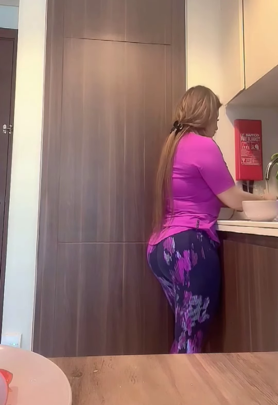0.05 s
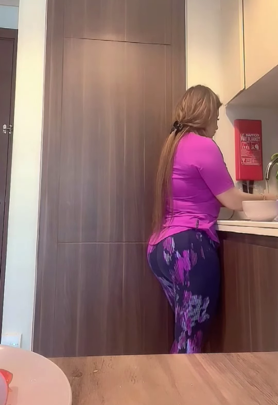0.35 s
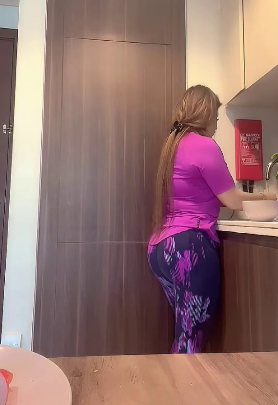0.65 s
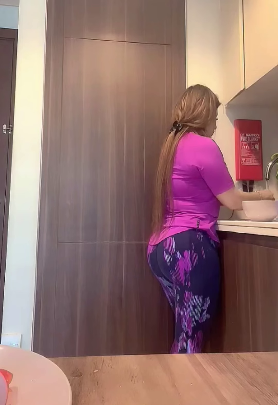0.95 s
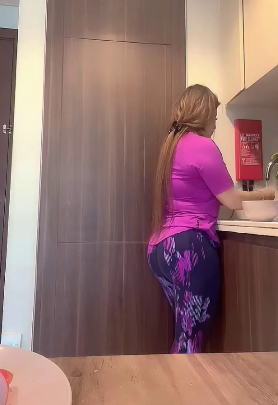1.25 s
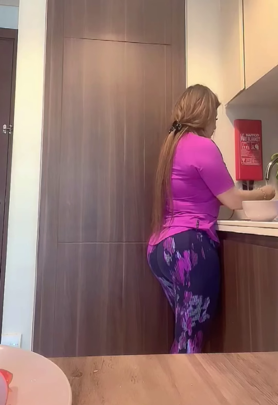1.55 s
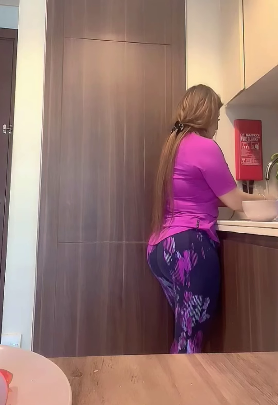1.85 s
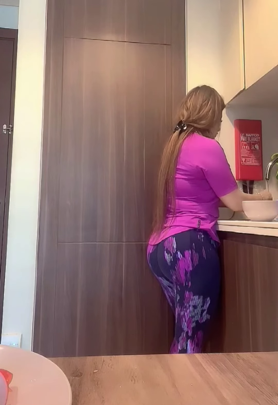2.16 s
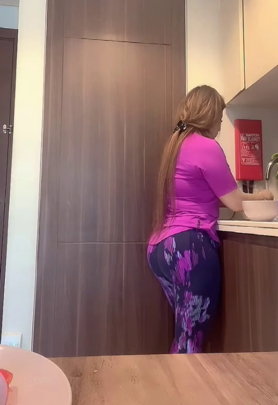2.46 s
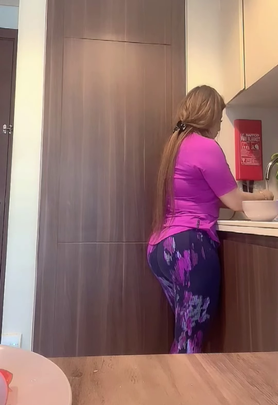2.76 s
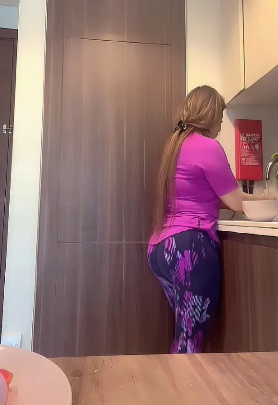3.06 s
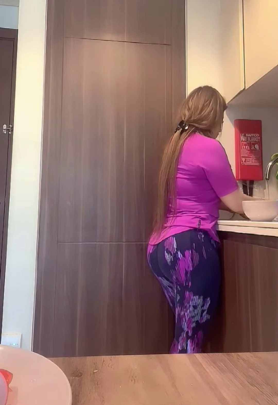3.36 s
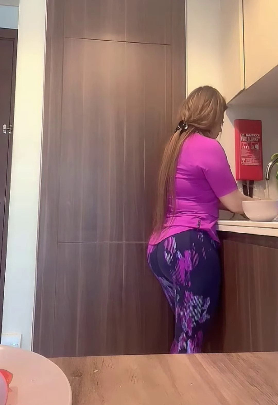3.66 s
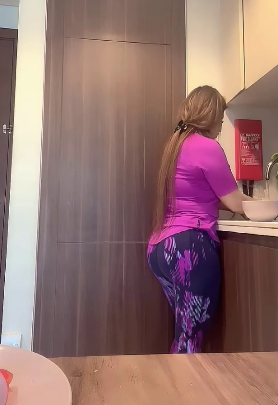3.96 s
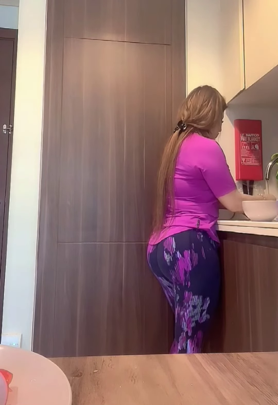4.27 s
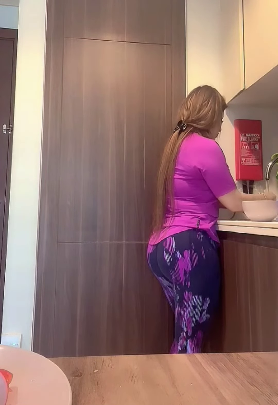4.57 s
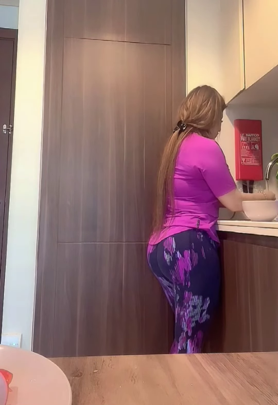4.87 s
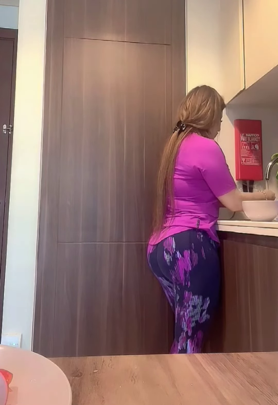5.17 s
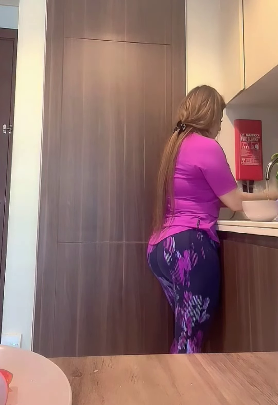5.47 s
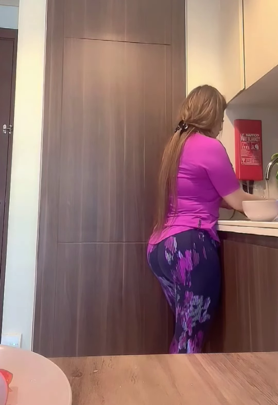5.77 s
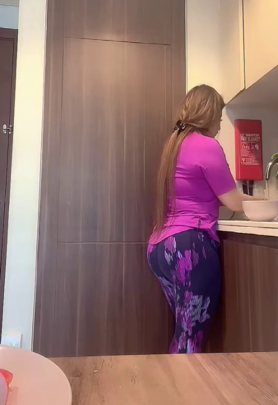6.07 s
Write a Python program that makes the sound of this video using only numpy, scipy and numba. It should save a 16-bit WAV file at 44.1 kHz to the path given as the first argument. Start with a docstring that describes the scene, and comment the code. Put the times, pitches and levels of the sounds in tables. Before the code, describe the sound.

Hands rinse something in a bowl of water at a kitchen sink. After a few faint drips, the water sloshes and spills in irregular bursts, with small wet squelches and single drops that make the sink ring lightly. Brief lulls separate the splashes, which come closer together near the end. It is heard from a few metres away in a small, hard kitchen with a soft rumble and low hum.

```python
"""Rinsing in a kitchen sink.

Hands rinse something in a bowl of water, a few metres away in a small, hard kitchen.
Each move sloshes the water and spills droplets into the ringing sink, as swarms of bubbles.
Wet squelches and single drops stand out, over a soft room rumble and hum."""
import sys
import numpy as np
from scipy import signal
from scipy.fft import rfft, irfft, next_fast_len
from scipy.io import wavfile
from scipy.ndimage import uniform_filter1d
from numba import njit

SR = 44100
rng = np.random.default_rng(int(sys.argv[2]) if len(sys.argv) > 2 else 0)


def generate_wav(sig):
    """Save sig (samples, or channels by samples) to the path in sys.argv[1] as 16-bit PCM at SR."""
    pcm = np.round(np.clip(np.atleast_2d(sig).T, -1, 1) * 32767).astype(np.int16)
    wavfile.write(sys.argv[1], SR, pcm)


N = 275184
TIME = np.arange(N) / SR
TOP_HZ = 15800


def undb(db):
    """Decibels to gain."""
    return 10 ** (np.asarray(db) / 20)


def shape(x, gain):
    """Filter by a gain that is a function of frequency."""
    size = next_fast_len(len(x) + 2048)
    hz = np.maximum(np.fft.rfftfreq(size, 1 / SR), 1)
    return irfft(rfft(x, size) * gain(hz), size)[:len(x)]


def colour(x, points):
    """Filter by (Hz, dB) points."""
    hz, db = np.transpose(points)
    return shape(x, lambda f: undb(np.interp(np.log(f), np.log(hz), db)))


def drift(rate_hz):
    """Smooth random drift with a spread near 1."""
    return np.interp(TIME * rate_hz, np.arange(1000), rng.standard_normal(1000))


def add(track, start_s, sound, db):
    """Mix in a short sound whose loudest 6 ms have the given level."""
    power = uniform_filter1d(sound ** 2, size=265).max()
    start = max(int(start_s * SR), 0)
    part = track[start:start + len(sound)]
    part += sound[:len(part)] * undb(db) / np.sqrt(power + 1e-18)


# Room noise spectrum. Each row: frequency in Hz, relative density in dB.
AIR_SPECTRUM = [(25, -37), (38, -13), (52, -9), (100, -3), (170, -3), (380, -5.5), (520, -11.5),
                (1000, -10), (2000, -18.5), (4000, -25), (7400, -29), (9500, -47.5), (15500, -101)]
# Hum tones. Each row: frequency in Hz, offset from the hum level in dB.
HUM_TONES = [(72, -4.5), (97, -9)]
# Hum level. Each row: time in seconds, level in dB.
HUM_LEVEL = [(0.0, -57), (0.8, -59), (0.97, -50), (1.2, -63), (1.74, -50), (2.0, -56.5), (4.6, -60),
             (5.9, -58), (6.08, -51), (6.24, -49)]


def kitchen(air_db=-50.5, waver_db=2):
    """Soft rumble and hiss of the room, with a low wavering hum."""
    air = colour(rng.standard_normal(N), AIR_SPECTRUM)
    out = air * undb(air_db) / np.sqrt(np.mean(air ** 2))
    hum_db = np.interp(TIME, *np.transpose(HUM_LEVEL))
    for hz, offset_db in HUM_TONES:
        rms = undb(hum_db + offset_db + waver_db * drift(2.5))
        phase = 2 * np.pi * hz * TIME + 0.16 * drift(1.72)
        out += np.sqrt(2) * rms * np.sin(phase)
    return out


def room(wet_db, low_t60_s=0.22, high_t60_s=0.25, split_hz=6000, build_s=0.002):
    """Impulse response from the sink: direct sound, then dense reflections off cupboards and tiles."""
    t = TIME[:SR // 4]
    low, high = (rng.standard_normal(len(t)) * 1000 ** (-t / t60) for t60 in (low_t60_s, high_t60_s))
    tail = signal.lfilter(*signal.butter(2, split_hz, fs=SR), low)
    tail += signal.lfilter(*signal.butter(2, split_hz, "high", fs=SR), high)
    tail *= 1 - np.exp(-t / build_s)
    response = tail * undb(wet_db) / np.linalg.norm(tail)
    response[0] += 1
    return response


@njit
def bubbles(starts, hz, life_s, sizes, rise, swell_s, samples):
    """Sum of bubbles: sines that swell, then die by 60 dB within their life while their pitch rises."""
    out = np.zeros(samples)
    for k in range(len(starts)):
        life, phase = life_s[k] * SR, 0.
        for i in range(min(int(life), samples - starts[k])):
            phase += 2 * np.pi * hz[k] / SR * (1 + rise * i / life)
            onset = 1 - np.exp(-(i / (swell_s * SR)) ** 2)
            out[starts[k] + i] += sizes[k] * np.sin(phase) * np.exp(-6.9 * i / life) * onset
    return out


# Single drops. Each row: start in seconds, pitch in Hz, level before trim in dB.
DROPS = [(0.002, 2820, -42), (0.236, 5870, -47.5), (1.089, 3315, -44), (1.358, 1606, -30.5),
         (1.375, 1566, -25), (1.376, 2470, -21), (1.562, 3050, -27), (1.624, 4050, -34),
         (1.739, 1592, -35.5), (1.751, 371, -37.5), (1.79, 2870, -35), (1.881, 1097, -34.5),
         (1.886, 3470, -30.5), (2.054, 857, -20.5), (2.059, 1008, -26.5), (2.078, 2440, -31.5),
         (2.085, 828, -21.5), (2.142, 3850, -24), (2.218, 3025, -20.5), (2.228, 3860, -18.5),
         (2.24, 367, -50), (2.25, 837, -25), (2.365, 5090, -32.5), (2.415, 2445, -27.5), (2.95, 715, -37),
         (3.115, 2450, -36), (3.155, 2893, -24.5), (3.218, 3850, -28), (3.31, 3820, -23.5),
         (3.425, 368, -38.5), (3.428, 2394, -23.5), (3.432, 558, -26.5), (3.44, 2080, -24.5),
         (3.471, 2330, -27.5), (3.483, 7360, -21), (3.52, 3007, -19), (3.612, 4530, -32),
         (3.729, 2460, -36), (4.145, 2414, -40), (4.168, 7140, -24), (4.185, 856, -26), (4.264, 532, -27.5),
         (4.274, 2418, -25.5), (4.41, 1820, -46), (4.524, 5360, -47), (4.595, 5830, -45),
         (4.616, 3890, -36), (4.695, 2180, -47), (4.812, 2448, -26.5), (4.835, 545, -37),
         (4.932, 1955, -24.5), (4.945, 2030, -21), (4.975, 1985, -34), (5.047, 2952, -22.5),
         (5.119, 2892, -29), (5.156, 3160, -31.5), (5.175, 538, -38), (5.182, 3000, -28),
         (5.212, 2420, -28), (5.24, 855, -38), (5.287, 3990, -29.5), (5.36, 2480, -33),
         (5.377, 2430, -29.5), (5.391, 362, -38), (5.39, 523, -33), (5.411, 846, -28), (5.415, 2410, -24),
         (5.459, 5530, -23), (5.62, 577, -29), (5.754, 3756, -28.5), (6.032, 844, -30.5),
         (6.19, 4420, -35.5)]


def drops(trim_db=-1):
    """Each drop traps one bubble that rings briefly, rising a little as it nears the surface."""
    out = np.zeros(N)
    for start_s, hz, db in DROPS:
        life_s = 22 / hz + 0.026
        note = bubbles(np.zeros(1, np.int64), np.array([float(hz)]), np.array([life_s]), np.ones(1),
                       rise=0.045, swell_s=8 / hz, samples=SR // 10)
        add(out, start_s, signal.fftconvolve(note, room(wet_db=-2)), db + trim_db)
    return out


# Colour of spilling water. Each row: frequency in Hz, gain in dB.
WATER_COLOUR = [(150, 0), (300, -14.5), (600, 0.5), (1000, 4.5), (1400, -12.5), (2600, -5), (3200, 0.5),
                (5000, 11), (7600, 16.5), (8500, 8), (10000, 7), (13500, 20.5), (16000, 7)]
# Sink and bowl resonances. Each row: frequency in Hz, width in Hz, peak gain in dB.
SINK_MODES = [(365.3, 11, 9), (564, 25, 10.5), (726.5, 40, 13), (834, 55, 10.5), (1010, 28, 6),
              (1600, 34, 7.5), (2088, 61, 11.5), (2436, 54, 18.5), (2942, 140, 10.5), (3770, 90, 11.5),
              (4900, 26, 9), (5800, 90, 4.5), (6800, 21, 3), (7410, 324, 9)]


def sink(water):
    """Colour the water; the sink and bowl ring with it at their own pitches."""
    def gain(f):
        return 1 + sum((undb(db) - 1) / (1 + 1j * (f * f - hz * hz) / (f * width_hz))
                       for hz, width_hz, db in SINK_MODES)
    return shape(colour(water, WATER_COLOUR), gain)


# Wet slaps and squelches. Each row: time in seconds, centre pitch in Hz, relative pitch spread,
# half-length in seconds, level before trim in dB.
SQUELCHES = [(0.462, 7260, 0.031, 0.007, -31.5), (1.067, 8560, 0.057, 0.0082, -47),
             (1.201, 6740, 0.039, 0.005, -21.5), (1.276, 5720, 0.092, 0.008, -18),
             (1.295, 6000, 0.13, 0.0066, -19.5), (1.594, 5500, 0.042, 0.0059, -21),
             (1.752, 6990, 0.33, 0.0072, -26.5), (1.881, 4660, 0.4, 0.02, -28),
             (1.931, 4030, 0.33, 0.021, -20.5), (1.99, 6700, 0.27, 0.005, -18),
             (1.994, 6780, 0.15, 0.012, -22), (2.053, 7340, 0.19, 0.0057, -16.5),
             (2.212, 3300, 0.32, 0.0082, -23), (2.237, 4140, 0.26, 0.013, -22.5),
             (2.412, 4580, 0.3, 0.0093, -22), (2.96, 5030, 0.17, 0.008, -25.5),
             (2.994, 7480, 0.23, 0.0074, -19), (3.159, 4600, 0.4, 0.003, -24),
             (3.293, 3490, 0.12, 0.0015, -17), (3.476, 6620, 0.29, 0.007, -21),
             (4.047, 3930, 0.14, 0.0024, -21), (4.056, 3960, 0.15, 0.01, -28),
             (4.097, 6210, 0.33, 0.007, -28), (4.271, 7360, 0.082, 0.005, -21.5),
             (4.812, 6490, 0.24, 0.01, -20.5), (4.883, 6450, 0.21, 0.011, -20),
             (4.914, 5630, 0.047, 0.006, -22), (4.945, 5950, 0.27, 0.0098, -33),
             (4.996, 4780, 0.38, 0.0025, -21), (5.007, 5970, 0.12, 0.0039, -21.5),
             (5.046, 4470, 0.4, 0.0025, -24.5), (5.083, 5740, 0.46, 0.0065, -24),
             (5.208, 3450, 0.303, 0.005, -23), (5.272, 5100, 0.16, 0.0081, -28.5),
             (5.305, 6130, 0.056, 0.0079, -31), (5.377, 4300, 0.21, 0.0023, -20),
             (5.415, 4100, 0.44, 0.0055, -27.5), (5.446, 3840, 0.394, 0.0035, -19),
             (5.446, 8460, 0.073, 0.008, -24), (5.461, 5430, 0.065, 0.007, -21.5),
             (5.504, 4190, 0.31, 0.014, -23), (5.616, 4660, 0.04, 0.0032, -29),
             (5.747, 4030, 0.3, 0.0073, -33), (5.791, 4840, 0.078, 0.012, -30),
             (5.909, 3400, 0.13, 0.0018, -16), (5.957, 3490, 0.13, 0.007, -28.5),
             (5.983, 6350, 0.085, 0.006, -22.5), (6.021, 5120, 0.19, 0.016, -28.5),
             (6.203, 7230, 0.4, 0.0047, -27)]


def squelches(count=64, lowest_hz=2700, scatter_db=2, trim_db=-1):
    """Water squeezed out under the hands bursts in a volley of tiny bubbles, which rings the sink."""
    out = np.zeros(N)
    ranks = (np.arange(count) + 0.5) / count
    arch = np.sin(np.pi * ranks ** 0.8) ** 2
    for time_s, centre_hz, spread, half_s, db in SQUELCHES:
        ratio = 2 ** (1.75 * spread)
        low_hz, high_hz = max(centre_hz / ratio, lowest_hz), min(centre_hz * ratio, TOP_HZ)
        hz = rng.permutation(np.geomspace(low_hz, high_hz, count))
        starts = (2 * half_s * SR * (ranks + rng.random(count) / count)).astype(np.int64)
        sizes = arch * undb(scatter_db * rng.standard_normal(count))
        # A flat slap is choked at once and arrives mostly direct.
        is_slap = half_s < 0.003
        cycles, wet_db = (22.5, -2) if is_slap else (45, 1.5)
        volley = bubbles(starts, hz, cycles / hz, sizes, rise=0.04, swell_s=0.0018, samples=SR // 10)
        volley = sink(signal.fftconvolve(volley, room(wet_db)))
        add(out, time_s - 0.39 * half_s, volley, db + trim_db)
    return out


def swarm(flow_db, low_hz, high_hz, per_s, cycles, scatter_db, wet_db, flutter_db):
    """Random bubbles of one size range; the flow sets their level and flutters as the water breaks up."""
    when, pitch, life, size = rng.random((int(per_s * N / SR), 4)).T
    hz = low_hz * (high_hz / low_hz) ** pitch
    life_s = cycles * (0.5 + life) / hz
    sizes = undb(-scatter_db * np.log(1 - 0.98 * size))
    water = sink(bubbles((when * N).astype(np.int64), hz, life_s, sizes,
                         rise=0.037, swell_s=0.0015 + 1 / low_hz, samples=N))
    # Bubbles that sound together share the flow.
    local_power = np.abs(uniform_filter1d(water ** 2, int(0.05 * SR)))
    water /= np.sqrt(local_power + np.mean(water ** 2) / 20)
    flow = undb(flow_db + flutter_db * drift(45))
    walls = room(wet_db)
    return signal.fftconvolve(water * flow, walls)[:N] / np.linalg.norm(walls)


def flow_power(moves, attack_s, sag_db_per_s, release_s):
    """Each move of water builds, sags and drains away. One power track per level column."""
    t = TIME[::50]
    power = 0
    for start_s, length_s, *levels_db in moves:
        age_s = np.maximum(t - start_s, 0)
        held = np.minimum(age_s / attack_s, 1) * undb(-sag_db_per_s * np.minimum(age_s, length_s))
        drain = np.exp(-np.maximum(age_s - length_s, 0) / release_s)
        power = power + np.outer(undb(levels_db), held * drain) ** 2
    return np.array([np.interp(TIME, t, track) for track in power])


# Water running off the hands. Each row: start and length in seconds, slosh, gurgle, splash, spray in dB.
SPURTS = [(0.0, 0.017, -41, -49, -46.5, -61), (1.2, 0.32, -75, -65, -45, -62.5),
          (1.44, 0.65, -49.5, -61, -45.5, -53), (1.89, 0.35, -67, -51, -29, -44.5),
          (2.31, 0.17, -49, -58, -42.5, -56), (2.92, 0.33, -44.5, -52, -32.5, -51),
          (3.27, 0.28, -49.5, -47.5, -37, -49), (3.725, 0.046, -55.5, -61, -44, -59),
          (4.05, 0.19, -47.5, -58, -36.5, -61), (4.715, 0.14, -56, -56, -45.5, -57),
          (4.83, 0.287, -42, -47, -39.5, -49), (5.15, 0.31, -45, -50.5, -40.5, -57.5),
          (5.39, 0.32, -43, -51, -38, -50.5), (5.75, 0.27, -41.5, -50, -40.5, -56.5)]
# Hands heaving the water in the bowl. Each row: start and length in seconds, slosh and gurgle in dB.
HEAVES = [(1.37, 0.03, -52, -39), (1.755, 0.022, -38, -45), (2.045, 0.13, -38.5, -51),
          (2.22, 0.045, -36, -39), (2.94, 0.054, -37, -66), (3.1, 0.028, -46, -54),
          (3.42, 0.015, -32.5, -36), (4.13, 0.052, -35.5, -36), (4.255, 0.051, -35, -40),
          (4.925, 0.052, -39, -33.5), (5.245, 0.01, -41.5, -43.5), (5.38, 0.055, -33.5, -42),
          (5.61, 0.07, -36, -43), (5.99, 0.069, -36, -53)]
# Handfuls of droplets hitting the sink. Each row: start in seconds, splash and spray in dB.
SPATTERS = [(0.044, -44, -59), (0.447, -44.5, -52), (1.005, -58, -68), (1.1, -51, -58), (1.184, -44, -52),
            (1.275, -35.5, -50), (1.32, -37, -67), (1.37, -28, -58), (1.423, -31.5, -40), (1.515, -55, -36),
            (1.639, -32.5, -36), (1.785, -27, -28.5), (1.986, -15, -25.5), (2.045, -17.5, -34),
            (2.138, -13, -28), (2.275, -37, -34.5), (2.411, -20.5, -31), (2.62, -64, -59), (2.8, -71, -49),
            (2.866, -45, -47), (2.921, -27, -31.5), (2.99, -31, -34), (3.038, -25.5, -36),
            (3.135, -28, -32.5), (3.206, -32, -29.5), (3.471, -23, -38), (3.535, -25.5, -38),
            (3.806, -49, -51), (4.043, -32.5, -46), (4.196, -25.5, -44), (4.27, -35, -35.5),
            (4.485, -49, -45.5), (4.593, -44.5, -48.5), (4.811, -32, -37), (5, -25, -28), (5.044, -29, -38),
            (5.206, -37, -39.5), (5.443, -31, -46), (5.521, -43, -33.5), (5.644, -24.5, -32.5),
            (5.8, -40, -36), (5.977, -24, -33.5), (6.204, -40, -31)]


def rinsing(spatter_s=0.007, trickle_splash_db=-71, trickle_spray_db=-79.5):
    """Big air pockets slosh, smaller ones gurgle, droplets splash and their spray fizzes."""
    spatters = [(start_s, spatter_s, *levels_db) for start_s, *levels_db in SPATTERS]
    power = flow_power(SPURTS, attack_s=0.0062, sag_db_per_s=4.5, release_s=0.012)
    power[:2] += flow_power(HEAVES, attack_s=0.009, sag_db_per_s=8, release_s=0.046)
    power[2:] += flow_power(spatters, attack_s=0.0055, sag_db_per_s=100, release_s=0.0095)
    power[2:] += undb([[trickle_splash_db], [trickle_spray_db]]) ** 2
    slosh_db, gurgle_db, splash_db, spray_db = 10 * np.log10(power + 1e-18)
    slosh = swarm(slosh_db, low_hz=240, high_hz=1200, per_s=380, cycles=16,
                  scatter_db=3.2, wet_db=3.5, flutter_db=1.5)
    gurgle = swarm(gurgle_db, low_hz=1200, high_hz=2700, per_s=400, cycles=26,
                   scatter_db=4.5, wet_db=1.5, flutter_db=4)
    splash = swarm(splash_db, low_hz=2850, high_hz=8200, per_s=900, cycles=110,
                   scatter_db=5.5, wet_db=4, flutter_db=3.5)
    spray = swarm(spray_db, low_hz=8200, high_hz=15500, per_s=2500, cycles=26,
                  scatter_db=3.8, wet_db=2, flutter_db=4)
    return slosh + gurgle + splash + spray


def scene():
    """Sloshes, squelches and drops in the quiet kitchen, in mono."""
    return (rinsing() + squelches() + drops() + kitchen())[None]


def record(dry):
    """Steep low-pass on the top treble."""
    return signal.sosfilt(signal.ellip(10, 0.2, 80, TOP_HZ, fs=SR, output="sos"), dry)


dry = scene()
out = record(dry)
generate_wav(out)
```